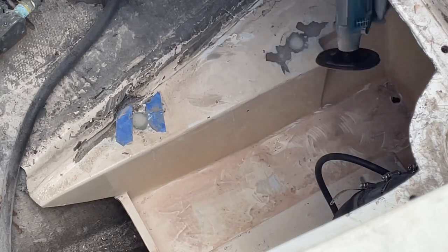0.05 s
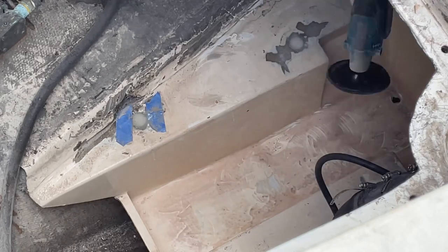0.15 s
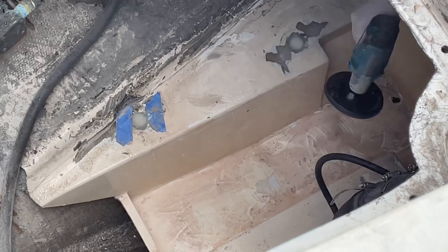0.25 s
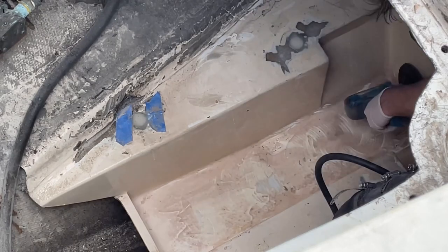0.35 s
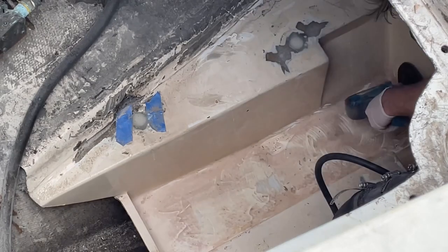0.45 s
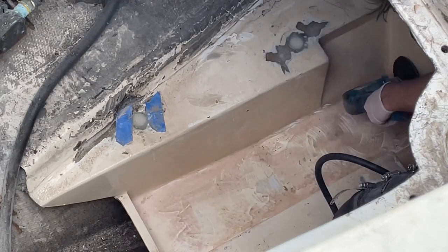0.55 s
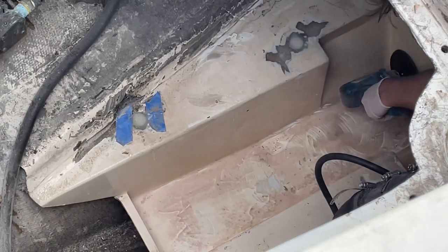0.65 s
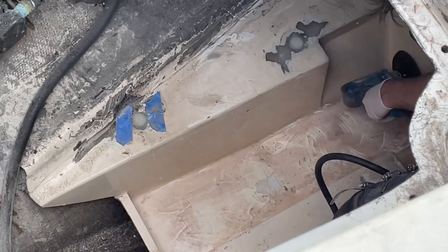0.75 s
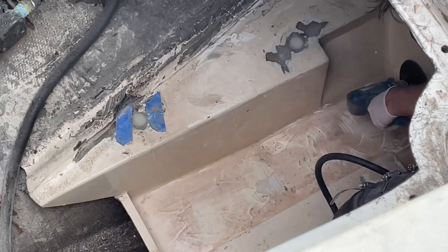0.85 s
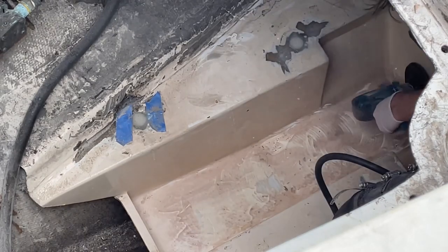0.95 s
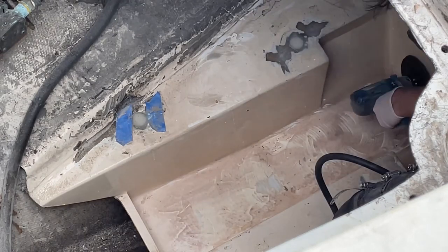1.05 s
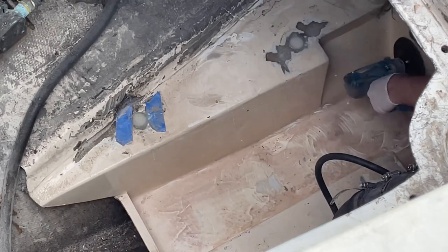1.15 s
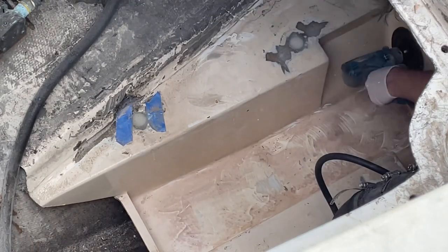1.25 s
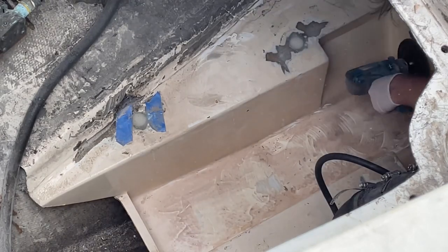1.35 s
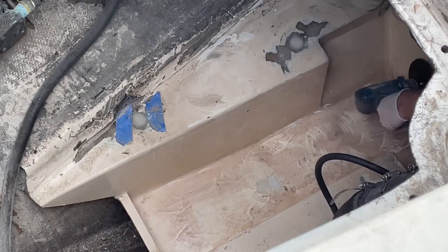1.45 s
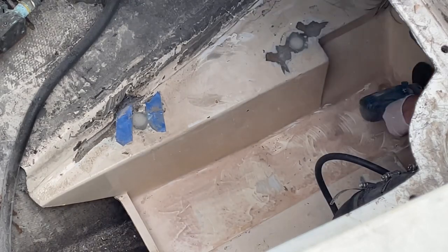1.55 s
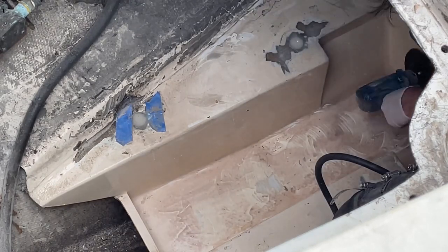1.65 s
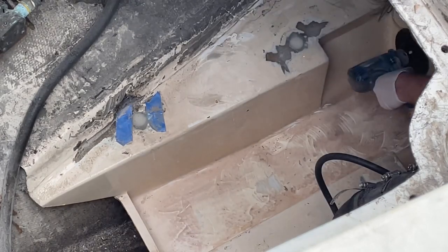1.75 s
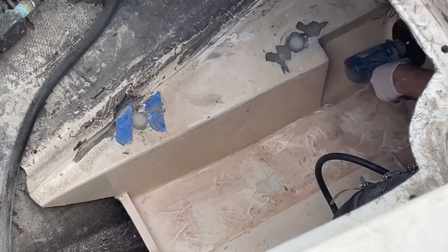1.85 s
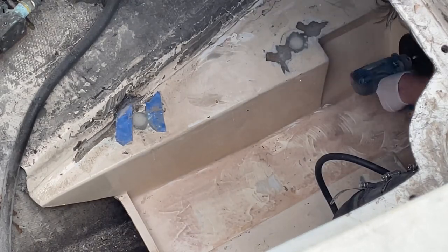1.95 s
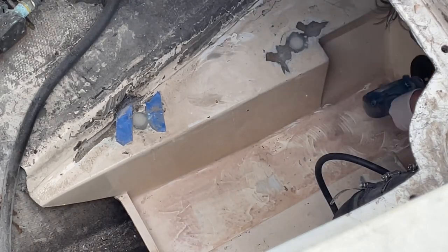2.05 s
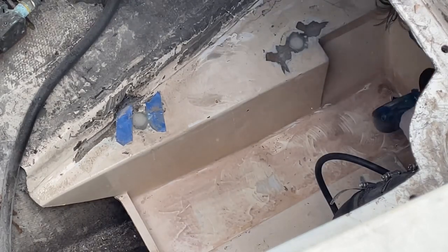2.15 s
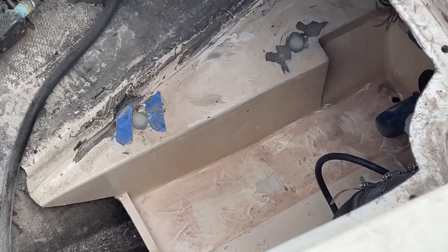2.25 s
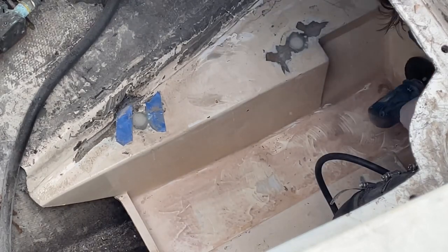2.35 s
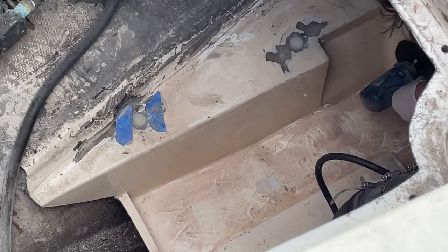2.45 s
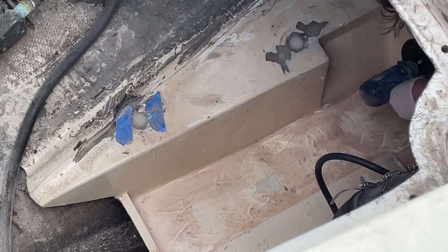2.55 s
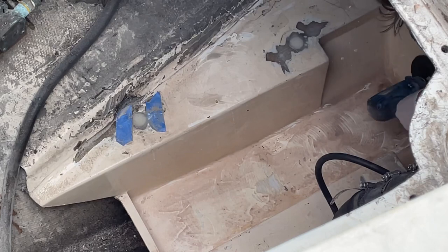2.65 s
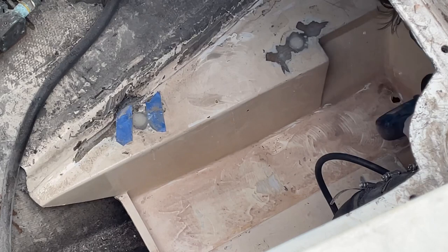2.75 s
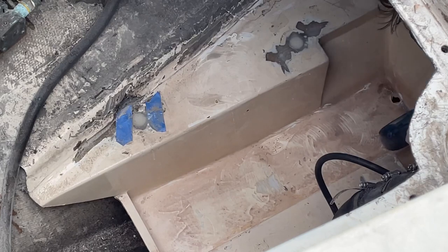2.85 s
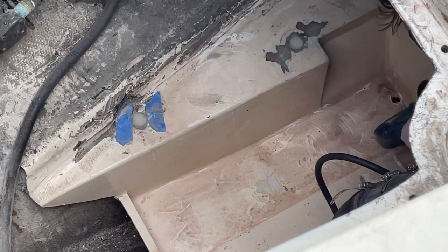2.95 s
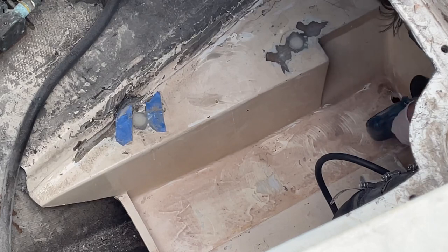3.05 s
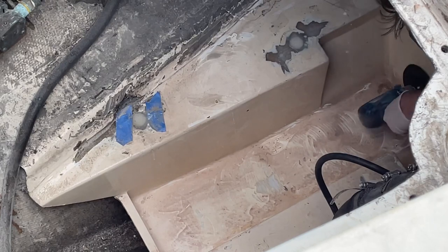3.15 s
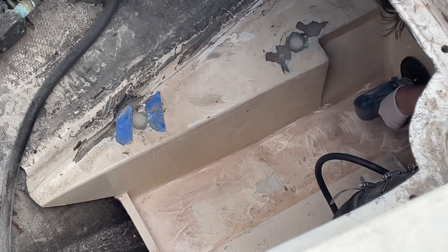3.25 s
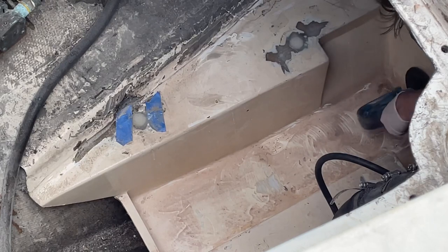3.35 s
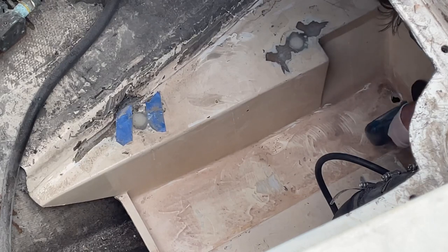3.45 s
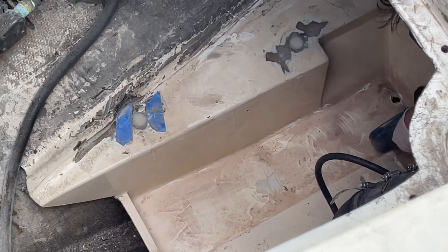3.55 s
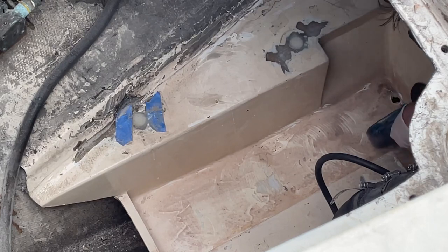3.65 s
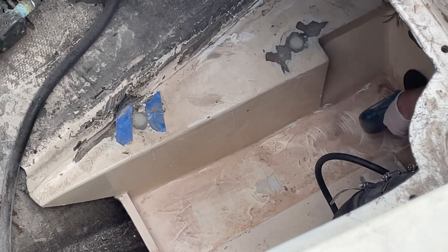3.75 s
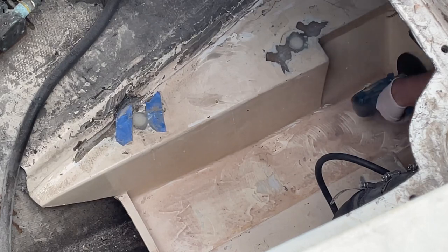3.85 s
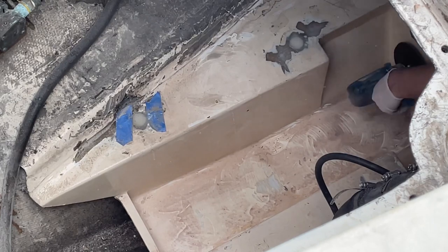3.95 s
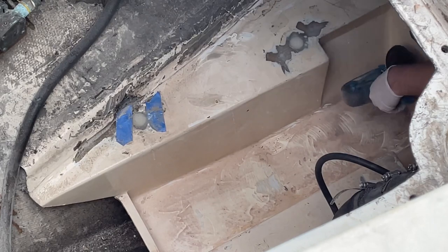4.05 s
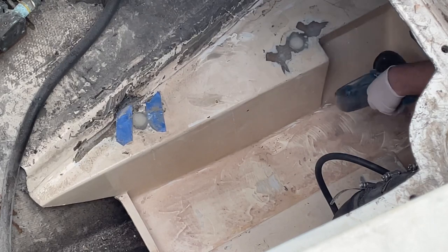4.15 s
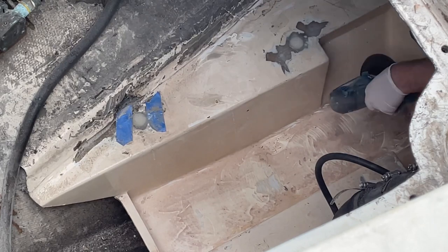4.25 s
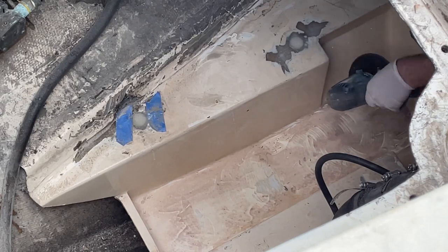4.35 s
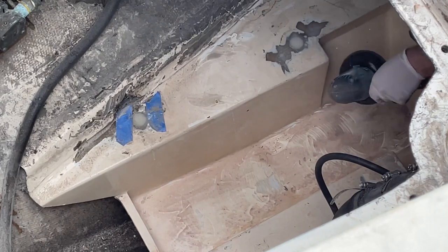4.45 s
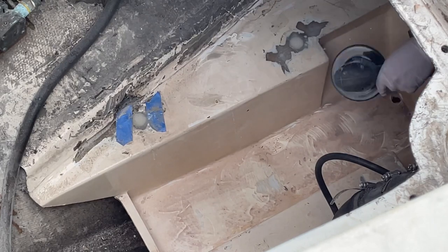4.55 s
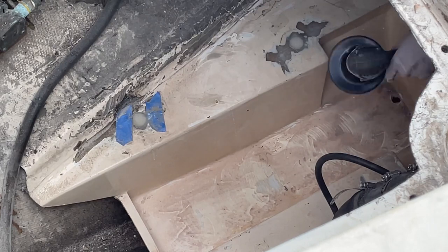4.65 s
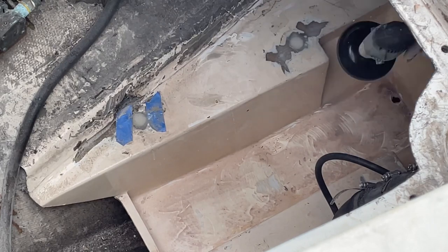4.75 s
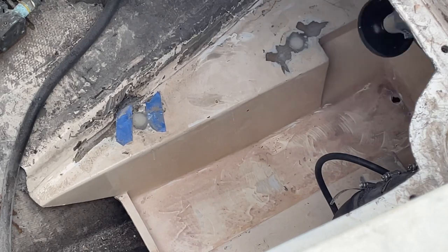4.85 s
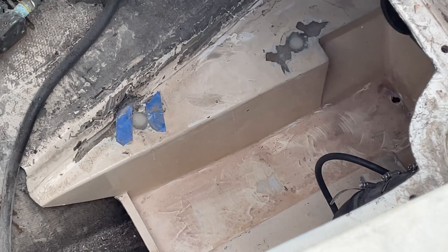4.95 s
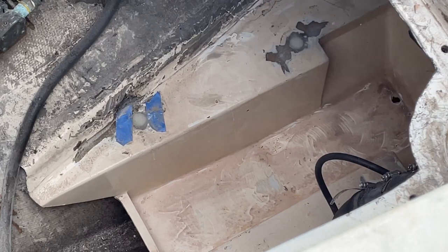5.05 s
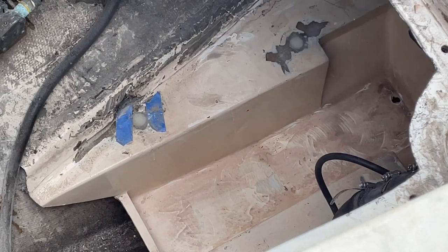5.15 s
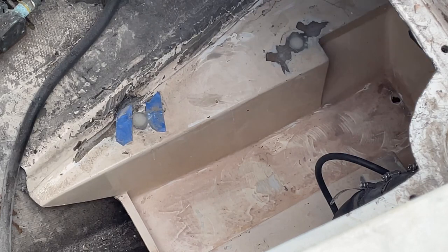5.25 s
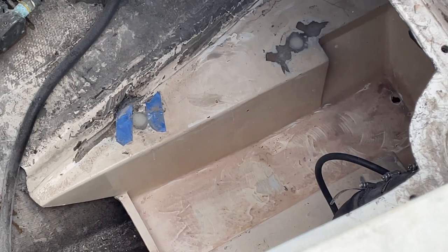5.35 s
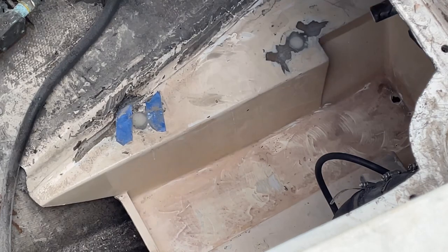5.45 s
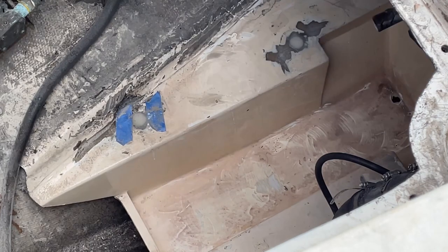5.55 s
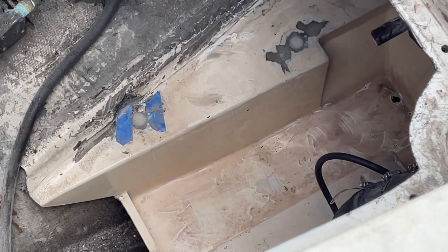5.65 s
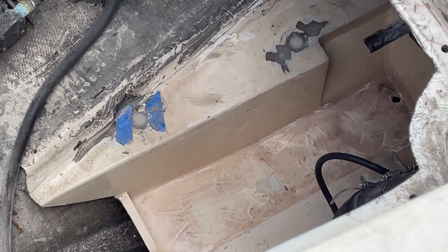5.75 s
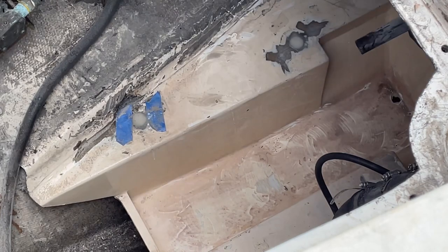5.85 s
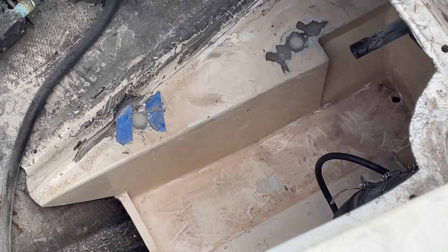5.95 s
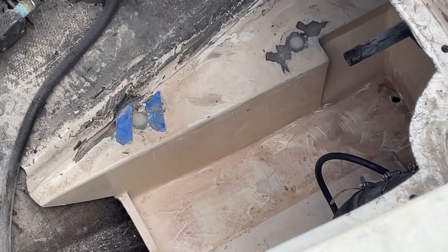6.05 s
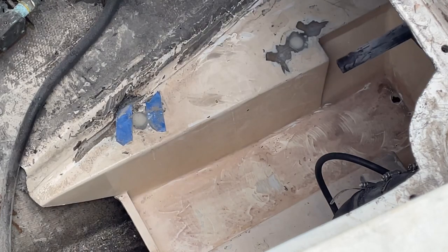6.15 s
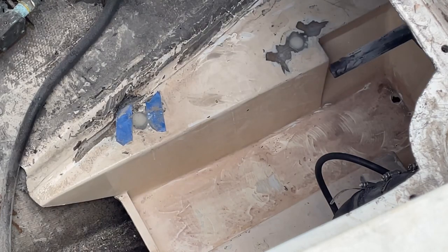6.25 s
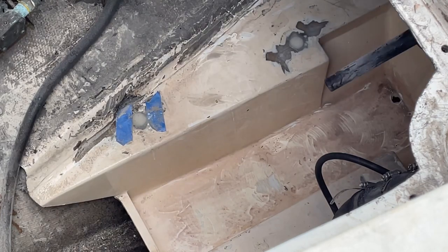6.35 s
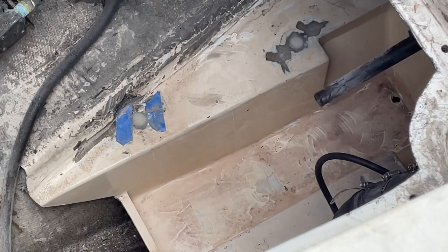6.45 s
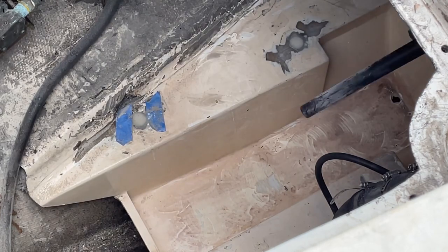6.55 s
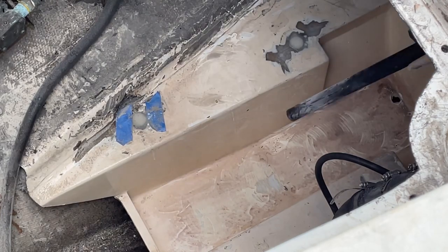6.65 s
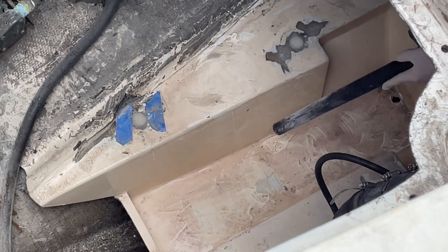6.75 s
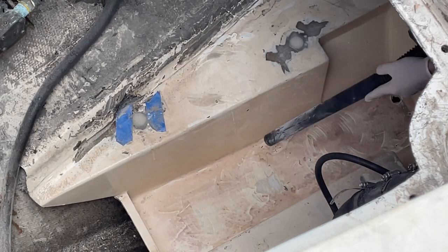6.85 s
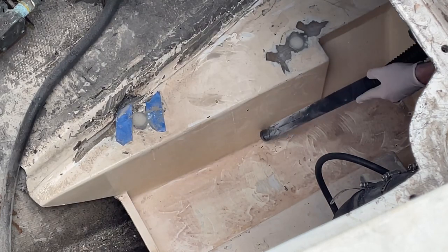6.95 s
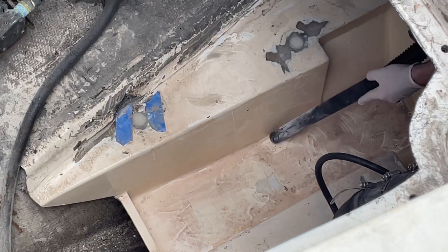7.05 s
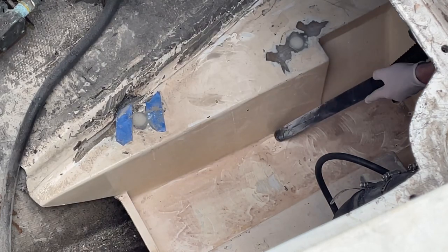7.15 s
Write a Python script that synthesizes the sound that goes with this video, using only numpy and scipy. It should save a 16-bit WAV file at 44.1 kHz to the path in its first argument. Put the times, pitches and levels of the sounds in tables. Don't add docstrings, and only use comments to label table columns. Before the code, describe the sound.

A close stereo phone listens from above in a quietly rumbling boatyard. From 0 to 0.3 seconds a disc sander coasts slowly, its gears rattling with a faint falling whine around 6 kHz. At 0.31 the disc bites the fiberglass hull: loud, abrasive grinding with a rough buzz near 69 turns a second, a very high whine near 15.5 kHz, and hollow ringing around 1.2 to 1.7 kHz that swells and shifts as the pad sweeps, tilts, skips and chatters. At about 3.85 it lifts; the grinding stops quickly and the whine and rattle glide down, while a distant engine passes near 4.9. At 5.47 the scene cuts abruptly. At 5.63 a shop vacuum clicks on, surging within half a second to a steady windy roar with a 400 Hz motor tone. From 6.94 to 7.13 its plastic wand clatters and thuds on the hull, the airflow hissing louder.

```python
import sys
import numpy as np
from scipy import signal
from scipy.fft import rfft, irfft, next_fast_len
from scipy.io import wavfile
from scipy.ndimage import uniform_filter1d, minimum_filter1d

SR = 44100
rng = np.random.default_rng(int(sys.argv[2]) if len(sys.argv) > 2 else 0)


def log_audio(samples):
    frames = np.atleast_2d(samples).T
    limited = np.clip(frames, -1, 1)
    pcm = np.round(limited * 32767).astype(np.int16)
    wavfile.write(sys.argv[1], SR, pcm)


def attenuation_scalar(level_db):
    decades = np.asarray(level_db, float) / 20
    return 10 ** decades


N = 316638
TIME = np.arange(N) / SR
CUT_S = 5.466
TOUCH_S, LIFT_S = 0.3112, 3.837


def sander():
    return gate(-1, CUT_S, fade=0.0028) * (motor_noise() + gate(0.309, 3.98, fade=0.0013) * pad_on_hull())


# t/s, whine level/dB
FACING = [(0, -39.5), (.12, -50.5), (.31, -47.5), (.32, -66), (.42, -60), (.46, -49), (.8, -41), (.84, -36),
          (.95, -56), (1.04, -44), (1.08, -28), (1.2, -25), (1.32, -23), (1.36, -30), (1.5, -27),
          (2.17, -27), (2.25, -38), (2.36, -27.5), (3.85, -28.5), (4.07, -37), (4.36, -36), (4.5, -41),
          (4.63, -39), (4.68, -32.5), (4.72, -36), (4.84, -37), (4.89, -29.5), (4.93, -35.5), (5.03, -41),
          (5.2, -43), (5.46, -46)]
# share of whine pitch, level/dB
SIDE_TONES = [(.614, -1), (1.22, -21), (1.998, -7)]
# share of whine pitch, level/dB, phase drift/rad
SHAFT_TONES = [(0.0663, -7, 1.4), (0.2016, -6, 2.6), (.325, -14, 2.2)]
# whine f/Hz, width/Hz, level/dB
SHAKES = [(10900, 500, 8), (9930, 600, 9), (8730, 400, 16)]
# f/Hz, level/dB per Hz
GEARS = [(40, -20), (90, -29), (300, -13), (800, -7), (2200, -3), (3500, -1.5), (5000, 1), (7500, 2),
         (10000, -1), (12000, -7), (15500, -8)]
# f/Hz, width/Hz, level/dB
CASE = [(2080, 150, 0), (2270, 160, 0)]
# t/s, half length/s, level over the rattle/dB
CASE_BUZZ = [
    (.04, .02, -9),
    (.1, .025, -8),
    (.19, .02, -8),
    (4.51, 0.05, -10),
    (4.62, .05, -18),
    (4.71, .03, -15),
    (4.83, .05, -18),
]
TEETH = 200
RUN_OUT = .6


def motor_noise():
    whine_hz, rattle_db = motor()
    whine_db, = curves(FACING)
    turns = np.cumsum(whine_hz) / SR
    whine = attenuation_scalar(whine_db - 1) * tone(turns, drift=.9, flutter_db=3.6, rate=65)
    unloaded = 1 - gate(0.3, 3.92, fade=.06)
    whine *= 1 + RUN_OUT * unloaded * np.cos(2 * np.pi * turns / TEETH + 1.3 * wobble(16)[0])

    fan = sum(attenuation_scalar(db) * (share * whine_hz < SR / 2) * tone(share * turns, drift=1.4, flutter_db=2.5, rate=40)
              for share, db in SIDE_TONES)
    passing = np.where(whine_hz > 7000, (whine_hz - 7500) / 900, (whine_hz - 5750) / 900)
    fan_db = -63 + 6 * (whine_hz < 9800) * np.clip(passing, -1, 1)

    shaft_db = -72 + np.max([db * hump(whine_hz, hz, wide) for hz, wide, db in SHAKES], axis=0)
    shaft = sum(attenuation_scalar(db) * tone(share * turns, drift, flutter_db=3.5, rate=30)
                for share, db, drift in SHAFT_TONES)

    rattle = 1.47 * rush(GEARS, patchy_db=1.0) * attenuation_scalar(0.38 * wobble(30)[0])
    buzz = unit(filtered(rattle, modes(CASE)))
    rattle += bells([(s, wide, attenuation_scalar(db)) for s, wide, db in CASE_BUZZ]) * buzz
    in_air = 1 - gate(0.27, 3.92, fade=0.078)
    return whine + in_air * (attenuation_scalar(rattle_db) * rattle + attenuation_scalar(fan_db) * fan + attenuation_scalar(shaft_db) * shaft)


# t/s, whine f/Hz
POWERED = [(.318, 15745), (.95, 15745), (1.1, 15735), (1.4, 15600), (1.6, 15670), (2.16, 15710),
           (2.56, 15560), (2.88, 15710), (3.2, 15540), (3.5, 15605), (3.74, 15420), (3.84, 15400),
           (3.88, 15150)]
# start t/s, whine f/Hz, speed loss per s, gear rattle level/dB
COASTS = [
    (0, 6347, .51, -56.5),
    (3.88, 15170, .427, -40),
]
RATTLE_GROWS = 2.92
SWING_S, SWING_WIDE_S, SWING_DB = 4.754, 0.35, 5


def motor():
    hz, = curves(POWERED)
    rattle_db = SWING_DB * hump(TIME, SWING_S, SWING_WIDE_S)
    for start, start_hz, loss, db in COASTS:
        now = (TIME >= start - .06) & ((TIME < POWERED[0][0]) | (start > TOUCH_S))
        speed = np.exp(-loss * np.clip(TIME - start, 0, None))
        hz = np.where(now & (TIME >= start), start_hz * speed, hz)
        rattle_db = rattle_db + now * (db + RATTLE_GROWS * level(speed))
    return hz, np.where(rattle_db > -20, -60, rattle_db)


# t/s, turns f/Hz
DISC = [(.4, 68.9), (.58, 69.5), (.75, 68.8), (1.0, 69.4), (1.3, 68.2), (1.5, 68.5), (1.6, 69.5),
        (1.9, 68.2), (2.0, 68.9), (2.5, 68.7), (2.7, 67.2), (2.8, 69.1), (3.1, 69.6), (3.3, 67.4),
        (3.4, 68.6), (3.7, 67.1), (3.84, 67.4)]
# f/Hz, width/Hz, level/dB
PANEL = [(1243, 34, -2.5), (1348.3, 31, 5)]
# f/Hz, width/Hz, level/dB
HULL = [(1504, 57, 4), (1647, 69, -5), (1693, 37, -1), (1960, 41, -6)]
# f/Hz, level/dB
DRUM = [(40, -37), (70, -20), (140, -8.5), (280, -13), (420, 4), (630, 2.5), (830, 5.5), (1050, 4.5),
        (1400, -16), (2500, 10.5), (3500, -60)]
# f/Hz, level/dB per Hz
GRIT = [(40, -47), (90, -21), (300, -12), (800, -7.5), (1500, 3), (2350, -4.5), (2750, 2.5), (3200, -2),
        (4400, -0.5), (4800, 1.5), (5250, 0.5), (6300, 0), (8000, 1), (10200, -1), (12000, -5.5),
        (15500, -1)]
# t/s, pitch from low 0 to high 1
BAY = [(.33, 0.5), (.4, 0.11), (.59, 0.68), (.72, 0.68), (.87, 0.43), (1.05, 0.57), (1.25, 0.27),
       (1.5, 0.46), (1.7, 0.8), (1.8, .1), (2.0, 0.54), (2.2, 0.49), (2.36, 0.55), (2.48, 0.15),
       (2.7, 0.43), (2.82, 0.79), (3.15, 0.6), (3.36, 0.5), (3.8, 0.55)]
# t/s, half length/s, f gained/Hz
SKIPS = [
    (2.33, .05, 8),
    (2.68, .04, 14),
    (2.97, .04, 6),
]
SLIP_HZ = .25
BAY_REACH = .05


def pad_on_hull():
    (ring_db, panel_db, grit_db, drum_db, throb_db), scraping = contact()
    disc = np.cumsum(curves(DISC)[0] + SLIP_HZ * wobble(12)[0]) / SR
    once_a_turn = np.cos(2 * np.pi * disc)
    scrape = rng.standard_normal(N) * (1 + 0.12 * once_a_turn)
    shove = beat(disc) + 1.6 * scraping * scrape
    shove /= np.sqrt(1 + 0.49 * scraping ** 2)

    def sharp(response):
        return response * np.abs(response) ** .5

    panel = unit(filtered(shove, lambda f: sharp(modes(PANEL)(f))))
    drum = unit(filtered(shove, lambda f: attenuation_scalar(along(DRUM, f))))
    span, = curves(BAY)
    ring = np.zeros(N)
    for k in (-1, 0, 1):
        tuned = unit(filtered(shove, lambda f: sharp(modes(HULL)(f / (1 + k * BAY_REACH)))))
        share = np.clip(1 - np.abs(2 * np.clip(span, 0, 1) - (k + 1)), 0, 1)
        ring += np.sqrt(share) * tuned

    grit = rush(GRIT, patchy_db=0.96) * (1 + 0.066 * once_a_turn) * attenuation_scalar(0.89 * wobble(34.99)[0])
    throb = tone(3 * disc + np.cumsum(bells(SKIPS)) / SR, drift=.7, flutter_db=1.1, rate=14)
    throb += attenuation_scalar(-20) * gate(.75, 2.2, fade=.1) * tone(5 * disc, drift=.8, flutter_db=4, rate=9)
    throb += attenuation_scalar(-23) * tone(4 * disc, drift=0.55, flutter_db=3.5, rate=8.01)
    throb += attenuation_scalar(-24) * tone(2 * disc, drift=.6, flutter_db=3, rate=8.3)
    skin = attenuation_scalar(ring_db - 2.5) * ring + attenuation_scalar(panel_db) * panel + attenuation_scalar(drum_db + 0.5) * drum
    return skin + attenuation_scalar(grit_db + 7.0) * grit + attenuation_scalar(throb_db) * throb


# t/s, half length/s, level/dB
PUSHES = [
    (0.738, 0.086, 2.5),
    (1.157, 0.049, 3.5),
    (1.31, 0.056, 2.5),
    (1.675, 0.041, 2),
    (1.968, 0.11, 1),
    (2.321, 0.033, 4.5),
    (2.516, 0.053, 3),
    (3.064, 0.094, 4.5),
    (3.55, 0.048, 3),
    (3.72, 0.06, 4.5),
]
# t/s, half length/s, ring level/dB
SWEEPS = [(0.316, 0.0099, -34), (0.35, 0.027, -31.5), (0.54, 0.08, -28.5), (0.86, 0.079, -28.5),
          (1.063, 0.089, -27.5), (1.433, 0.1, -28.5), (1.62, 0.06, -34), (2.01, .025, -32.5),
          (2.077, 0.04, -30.5), (2.376, 0.043, -31.5), (2.474, 0.025, -35.5), (2.73, 0.033, -42),
          (2.836, .04, -36.5), (2.927, 0.047, -45), (3.068, 0.061, -31.5), (3.25, 0.036, -44),
          (3.41, 0.1, -31.5), (3.547, 0.043, -29.5), (3.688, 0.063, -29.5)]
# t/s, half length/s, level/dB
FLEXES = [(0.384, .05, -35), (0.847, 0.13, -42), (1.095, 0.043, -33), (1.32, 0.037, -35),
          (1.533, 0.034, -40), (1.642, 0.023, -34), (1.777, 0.032, -35), (1.998, 0.05, -40),
          (2.31, 0.043, -34), (2.5, 0.03, -32), (2.723, 0.022, -44), (2.947, 0.045, -42), (3.1, 0.037, -37),
          (3.217, 0.021, -38), (3.407, 0.05, -44), (3.576, 0.088, -35.5), (3.8, 0.037, -39.5)]
# t/s, half length/s, level/dB
LURCHES = [(.45, 0.12, -46), (0.94, 0.054, -44), (1.077, 0.027, -48), (1.34, 0.049, -45),
           (1.527, 0.013, -44), (1.67, 0.047, -45.5), (2.276, 0.049, -51), (2.463, 0.047, -40),
           (2.743, 0.036, -47), (2.96, 0.036, -48.5), (3.1, 0.035, -49), (3.585, 0.05, -45),
           (3.74, .05, -58)]
# t/s, half length/s, level/dB
TILTS = [(0.397, 0.13, -53), (.9, 0.075, -43), (1.097, 0.099, -50), (1.506, 0.11, -41), (1.7, 0.11, -51),
         (2.086, 0.11, -40.5), (2.253, 0.045, -40.5), (2.362, 0.038, -34), (2.485, 0.016, -37),
         (2.574, 0.019, -37.5), (2.693, 0.026, -38.5), (2.817, .026, -37.5), (2.954, .027, -41.5),
         (3.093, 0.046, -50), (3.204, 0.014, -40.5), (3.394, 0.04, -53), (3.596, 0.013, -50),
         (3.71, 0.015, -52), (3.86, .03, -46)]
# t/s, half length/s, added scraping
STUTTERS = [
    (1.84, .05, .6),
    (2.29, .05, 1.0),
    (2.63, .05, .6),
    (3.0, .04, .4),
    (3.65, .08, .9),
]
BITE_S, LIFT_DB_PER_S = 0.023, 117
RING_REST_DB, PANEL_DB, DRUM_DB = -43.5, -46.5, -44.5
GRIT_DB, THROB_REST_DB = -36.5, -54.5
SCRAPE, SCRAPE_PER_DB, SCRAPE_PER_S = .36, -.04, .11


def contact():
    push_db = bells(PUSHES)
    touch_db = level(np.clip((TIME - TOUCH_S) / BITE_S, 0, 1))
    touch_db -= LIFT_DB_PER_S * np.clip(TIME - LIFT_S, 0, None)
    jolts = wobble(16, count=4)
    ring_db = swells(RING_REST_DB, SWEEPS) + 1.45 * jolts[0]
    panel_db = swells(PANEL_DB, FLEXES) + 2.3 * jolts[1]
    drum_db = swells(DRUM_DB, LURCHES) + 1.9 * jolts[2]
    throb_db = swells(THROB_REST_DB, TILTS) + .5 * jolts[3]
    levels = np.array([ring_db, panel_db, GRIT_DB + push_db, drum_db, throb_db]) + touch_db
    scraping = SCRAPE + SCRAPE_PER_DB * push_db + SCRAPE_PER_S * TIME + bells(STUTTERS)
    return levels, np.clip(scraping, .1, 3)


def beat(disc, count=31, step=6):
    order = np.arange(1, count + 1)[:, None]
    phases = 2 * np.pi * (order * disc[::step] + rng.random((count, 1)))
    orders = attenuation_scalar(4.2 * wobble(9, count, step)) * np.cos(phases + 1.0 * wobble(7, count, step))
    return unit(signal.resample_poly(orders.sum(0), step, 1)[:N])


# f/Hz, width/Hz, level/dB
CANISTER = [(181, 21, 8.5), (350, 9.3, 16), (319, 6.7, 10)]
# shaft order, level against the air/dB, growth with speed
BLADES = [(3, -14, 0), (5, -10, 18), (7, -14, 2), (9, -8, .3), (12, -8, -.8), (18, -18, -1)]
# f/Hz, width/Hz, level/dB
DUCTS = [(1150, 120, -4), (1930, 220, 3), (2820, 170, 3), (3230, 120, 0), (3500, 190, 2), (4350, 200, 0),
         (4720, 160, 2)]
# full-speed level/dB, growth with speed, level gained at the floor/dB
FLOW = [
    (-33.5, 2.6, 3.5),
    (-34.5, 2.05, 1.5),
    (-45, 3.9, 5.5),
]
# f/Hz, level/dB per Hz
AIR = [(900, -34), (1800, -2), (2600, 4), (3500, -1), (4600, 0.5), (5800, -2), (7000, -3.5), (9000, -52)]
# f/Hz, level/dB per Hz
ROAR = [(30, -30), (70, -14), (140, -19), (260, -0.5), (500, 2.5), (1100, 2), (1700, 1), (3000, -36)]
# f/Hz, level/dB per Hz
NOZZLE = [(4500, -37), (6500, 6.5), (8500, 5.5), (10500, -0.5), (13000, -6.5), (15500, -4.5)]
# f/Hz, width/Hz, level/dB
HOSE = [(790, 39, -33), (1059, 11, 7), (1670, 21, -37), (2044, 6.4, 15), (2450, 49, -9), (2905, 25, 2),
        (3640, 48, 0.5), (4440, 36, 2), (4710, 50, 1), (5340, 22, 5)]
SHAFT_HZ = 399
FLOOR_S, CLOSING_S = 7.0, 0.14
UNBALANCE_DB, SECOND_DB, SECOND_GROWS = -46.5, -44, 1.2
HUM_DB, HUM_GROWS = -46, 3.4


def vacuum():
    speed_db = level(spin())
    shaft_hz = SHAFT_HZ * attenuation_scalar(speed_db)
    turns = np.cumsum(shaft_hz) / SR
    closed = np.clip((TIME - FLOOR_S) / CLOSING_S, 0, 1)
    air_db, roar_db, hiss_db = [db + grows * speed_db + gain_db * closed for db, grows, gain_db in FLOW]

    first_db = UNBALANCE_DB + 0.2 * speed_db
    first_db += sum(db * hump(shaft_hz, hz, wide) for hz, wide, db in CANISTER)
    second_db = SECOND_DB + SECOND_GROWS * speed_db
    lines = attenuation_scalar(first_db) * tone(turns, 0.36, 2.5, 21.0) + attenuation_scalar(second_db) * tone(2 * turns, 1.0, 2.9, 22)

    blades = sum(attenuation_scalar(db + grows * speed_db) * tone(k * turns, drift=1.5, flutter_db=4.5, rate=32)
                 for k, db, grows in BLADES)
    blades *= attenuation_scalar(air_db - 8.5 + 6 * np.exp(-np.abs(TIME - 5.75) / .25))
    blades = filtered(gate(5.66, 9, fade=0.034) * blades, lambda f: 0.12 + np.abs(modes(DUCTS)(f)))

    spark = attenuation_scalar(-57 - 60 * np.clip(TIME - 5.63, 0, 9) / 0.24)
    flow = (attenuation_scalar(air_db) + attenuation_scalar(-3.5) * spark) * rush(AIR, patchy_db=1.5)
    flow += (attenuation_scalar(roar_db + 3.0) + attenuation_scalar(0.5) * spark) * rush(ROAR, patchy_db=1.0)
    flow = filtered(flow, lambda f: 0.69 + 0.82 * np.abs(modes(HOSE)(f)))
    hiss = (attenuation_scalar(hiss_db + 6.5) + spark) * rush(NOZZLE, patchy_db=.7)
    hum = attenuation_scalar(HUM_DB + HUM_GROWS * speed_db) * tone(120 * TIME, drift=0.35, flutter_db=4.0, rate=7.5)
    running = gate(5.612, 9, fade=0.0032)
    return gate(5.66, 9, fade=0.014) * lines + running * (flow + blades + hum + hiss)


SWITCH_S, SPIN_UP_S, SPIN_SHAPE = 5.635, .176, .87


def spin():
    return 1 - np.exp(-(np.clip(TIME - SWITCH_S, 0, None) / SPIN_UP_S) ** SPIN_SHAPE)


# t/s, level/dB, chatter/s, dullness 0-1, hardness 0-1
BUMPS = [(5.639, -46, .05, 0, 0), (6.941, -15, 0.014, 0, 0.62), (6.957, -17.5, 0.022, 0.15, 0.5),
         (7.003, -18, .008, 0.72, 0.3), (7.02, -16, 0.0072, 0.7, 0.2), (7.049, -22, .02, 0.6, 0.2),
         (7.066, -23, .008, 0.03, 0.27), (7.074, -17.5, 0.0046, 0.16, 0.1), (7.079, -15, 0.014, 0.22, 0),
         (7.093, -18.5, .016, 0.2, 0), (7.125, -25, 0.016, 0.26, 0)]
# f/Hz, width/Hz, level/dB
WAND = [(163, 69, 0.5), (417, 84, 5), (657, 69, -2.5), (846, 27, 0.5), (1110, 180, -6), (1380, 82, -17)]


def wand():
    chatter, push = np.zeros(N + SR), np.zeros(N + SR)
    t = np.arange(4000) / SR
    thud = np.sin(2 * np.pi * 85 * t) * attenuation_scalar(-60 * t / 0.057) * (1 - np.exp(-t / 0.0033))
    for s, db, length, dull, hard in BUMPS:
        struck = (rng.random(4000) < 700 / SR) * (t < length)
        blows = rng.choice([-1, 1], 4000) * struck * (1 - 0.43 * t / length)
        blows[0] = 0.55
        blows = (1 - hard) * blows + 11 * hard * np.diff(blows, prepend=0)
        at = round(s * SR)
        chatter[at:at + 4000] += (1 - dull) * attenuation_scalar(db + 31.5) * blows
        push[at:at + 4000] -= dull * attenuation_scalar(db + 8.5) * thud
    return filtered(chatter[:N], modes(WAND)) + push[:N]


# from t/s, rumble level/dB, hush level/dB
YARD_SHOTS = [
    (0, -69.5, -56.5),
    (0.321, -60.5, -54.5),
    (4.0, -66.5, -54.5),
    (4.96, -61, -55.5),
    (5.1, -69, -55),
    (5.465, -67.5, -100),
    (5.48, -52.5, -72.5),
    (5.529, -53.5, -71),
]
# f/Hz, level/dB per Hz
RUMBLE = [(20, -33), (45, -6.5), (80, 0.5), (140, -7.5), (300, -11.5), (600, -23.5), (1200, -53)]
# f/Hz, level/dB per Hz
HUSH = [(150, -34), (400, -18.5), (1100, 0.5), (2100, 1.5), (3200, -1.5), (7000, -5.5), (15500, -40)]
ENGINE_S, ENGINE_PASS_S, ENGINE_HZ, ENGINE_FALL_HZ_PER_S = 4.9, 0.49, 86, 1.5
ENGINE_DB, ENGINE_FAR_DB = -56, -71
MURMUR_HZ, MURMUR_DB = 1120, -67.5
SHUDDER_DB = -54.5


def yard():
    engine_hz = ENGINE_HZ - ENGINE_FALL_HZ_PER_S * np.clip(TIME - ENGINE_S, -1, 1)
    firings = np.cumsum(engine_hz) / SR
    near = attenuation_scalar(ENGINE_FAR_DB) + attenuation_scalar(ENGINE_DB) * hump(TIME, ENGINE_S, ENGINE_PASS_S)
    far = near * tone(firings, drift=0.56, flutter_db=3.5, rate=25)
    far += attenuation_scalar(MURMUR_DB) * gate(-1, TOUCH_S) * tone(MURMUR_HZ * TIME, 1.8, 3.5, 41)
    far += attenuation_scalar(-76) * hump(TIME, 5.12, 0.17) * tone(1.7 * firings, 1.1, 4.9, 12)

    starts, rumble_db, hush_db = np.transpose(YARD_SHOTS)
    shot = np.searchsorted(starts, TIME, "right").clip(1) - 1
    rumble, hush = uniform_filter1d(attenuation_scalar([rumble_db, hush_db])[:, shot], size=200)
    rumble = rumble + attenuation_scalar(SHUDDER_DB) * spin() ** .6
    noise = rumble * rush(RUMBLE, patchy_db=2.2) + hush * rush(HUSH, patchy_db=1.5)
    return gate(-1, CUT_S) * far + noise


def unit(x):
    return x / np.sqrt(np.mean(x ** 2) + 1e-20)


def level(gain):
    return 20 * np.log10(np.abs(gain) + 1e-6)


def along(points, hz):
    f, v = np.transpose(points)
    return np.interp(np.log(hz + 1), np.log(f + 1), v)


def curves(rows):
    s, *cols = np.transpose(rows)
    return [np.interp(TIME, s, c) for c in cols]


def gate(start, stop, fade=0.0069):
    return np.clip((TIME - start) / fade, 0, 1) * np.clip((stop - TIME) / fade, 0, 1)


def hump(x, centre, wide):
    return np.exp(-.5 * ((x - centre) / wide) ** 2)


def bells(events):
    coarse = TIME[::64]
    return np.interp(TIME, coarse, sum(height * hump(coarse, s, wide) for s, wide, height in events))


def swells(rest_db, events):
    return level(attenuation_scalar(rest_db) + bells([(s, wide, attenuation_scalar(db)) for s, wide, db in events]))


def wobble(rate, count=1, step=1):
    knots = rng.standard_normal((count, 400))
    return np.array([np.interp(TIME[::step] * rate, np.arange(400), row) for row in knots])


def filtered(x, response):
    m = next_fast_len(N + 8192)
    return irfft(rfft(x, m) * response(np.fft.rfftfreq(m, 1 / SR)), m)[..., :N]


def modes(table):
    def response(f):
        return sum((-1) ** k * attenuation_scalar(db) * 1j * f * w / (c * c - f * f + 1j * f * w)
                   for k, (c, w, db) in enumerate(table))
    return response


def rush(spectrum, patchy_db):
    z = signal.stft(rng.standard_normal(N), nperseg=512)[2]
    field = uniform_filter1d(uniform_filter1d(rng.standard_normal(z.shape), 8, 0), 10, 1)
    noise = signal.istft(z * attenuation_scalar(patchy_db * unit(field)), nperseg=512)[1][:N]
    return unit(filtered(noise, lambda hz: attenuation_scalar(along(spectrum, hz))))


def tone(turns, drift, flutter_db, rate):
    slip, swell = wobble(rate, count=2)
    return np.sqrt(2) * attenuation_scalar(flutter_db * swell) * np.sin(2 * np.pi * turns + drift * slip)


# f/Hz, left lead/rad
PORTS = [(150, 0), (700, .1), (1700, 0), (2300, .2), (2760, .8), (3500, .5), (4300, .75), (5170, .1),
         (5900, 1.05), (6900, 2.6), (7550, 3.14), (8300, 3.7), (9500, 4.85), (11000, 6.28), (14100, 9.42),
         (15700, 10.7)]
# f/Hz, left minus right level/dB
TILT = [(150, 0), (400, -1), (700, -1.6), (1200, 0)]
# f/Hz, level/dB
ECHO = [(100, -44), (250, -11), (600, -12), (1500, -18), (3000, -5.5), (6000, -8.5), (7600, -15.5),
        (10000, -10), (15500, -12.5)]


def scene():
    canister = vacuum()
    mono = sander() + canister + wand() + yard()
    sign = np.array([[.5], [-.5]])
    direct = filtered(mono, lambda f: attenuation_scalar(sign * along(TILT, f)) * np.exp(1j * sign * along(PORTS, f)))
    far = attenuation_scalar(4) * filtered(canister, lambda f: 1 / (1 + (f / 2300) ** 4) / (1 + (550 / (f + 1)) ** 4))
    tail = rng.standard_normal((2, 9000)) * attenuation_scalar(-60 * np.arange(9000) / SR / 0.2)
    echoes = signal.oaconvolve((mono + far)[None], tail / np.linalg.norm(tail[0]), axes=1)[:, :N]
    echoes *= 1 - gate(CUT_S - .003, 5.61, fade=.003)
    return direct + filtered(echoes, lambda f: attenuation_scalar(along(ECHO, f)))


# f/Hz, level under the stronger/dB
STARVE = [(100, -30), (800, -25), (1300, -21), (2000, -13), (3500, -13), (5000, -7), (7300, -5), (7900, -4),
          (8450, -9), (11000, -6), (13500, -6.5), (15000, -5), (15500, -12)]
THIN_HZ, THIN_DB, TONE_OVER_BAND = 10600, -26, 11


def thinned(x, loud_db=-44.5, waver_db=1.8, frame_db=2.2):
    lead = 772
    pair = np.pad([x[0] + x[1], x[0] - x[1]], ((0, 0), (lead, 0)))
    hz, _, z = signal.stft(pair, SR, window="cosine", nperseg=2048)
    edges = np.r_[0:224:16, 224:1024:32]
    band_hz = hz[edges, None]
    bins = np.abs(z) ** 2
    power = np.add.reduceat(bins, edges, axis=1)
    spare_db = waver_db * rng.standard_normal(power.shape[1:])
    spare_db = spare_db + frame_db * (band_hz > 12500) * rng.standard_normal(power.shape[2])

    threshold_db = along(STARVE, hz[edges + 12])[:, None] + spare_db
    keep = (power > power[::-1] * attenuation_scalar(2 * threshold_db)) | (power > attenuation_scalar(2 * loud_db))
    tonal = 32 * np.maximum.reduceat(bins, edges, axis=1) > TONE_OVER_BAND * power
    keep |= tonal & (np.abs(band_hz - 10500) < 3400)

    def wide(a):
        return np.repeat(a, np.diff(np.r_[edges, 1025]), axis=-2)

    tone_power = -minimum_filter1d(-bins, size=160, axis=1, origin=40)
    mask_db = THIN_DB - 8 * (hz[:, None] < 14300) + wide(spare_db)
    audible = uniform_filter1d(bins, size=9, axis=1) > tone_power * attenuation_scalar(2 * mask_db)
    keep = wide(keep) & ((hz[:, None] < THIN_HZ) | audible)
    total, difference = signal.istft(z * keep, SR, window="cosine", nperseg=2048)[1][:, lead:N + lead]
    return np.array([total + difference, total - difference]) / 2


def low_pass(x):
    return signal.sosfilt(signal.butter(12, 17160, fs=SR, output="sos"), x)


def record(dry):
    band = filtered(dry, lambda hz: 1 / (1 + (hz / 15790) ** 600) / (1 + (42 / (hz + 1)) ** 4))
    mix = thinned(band)
    return low_pass(mix)


dry = scene()
out = record(dry)
log_audio(out)
```